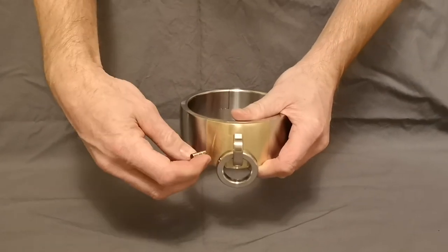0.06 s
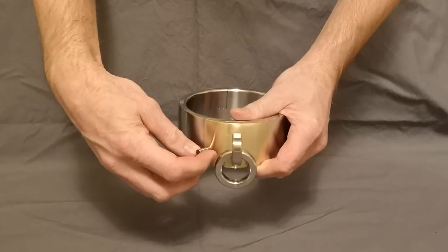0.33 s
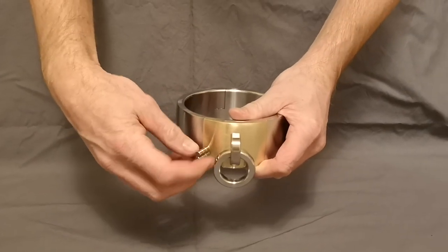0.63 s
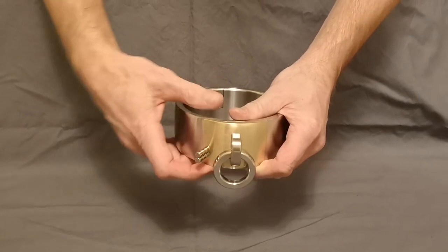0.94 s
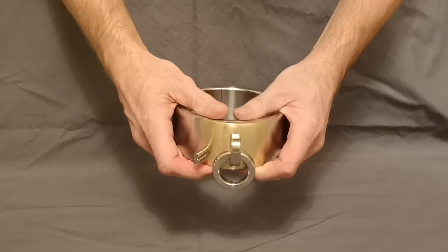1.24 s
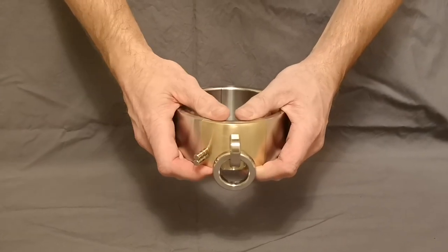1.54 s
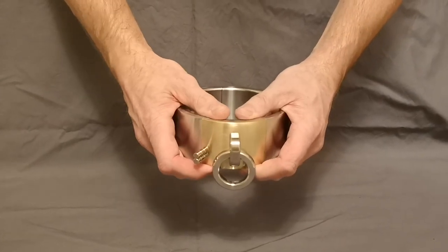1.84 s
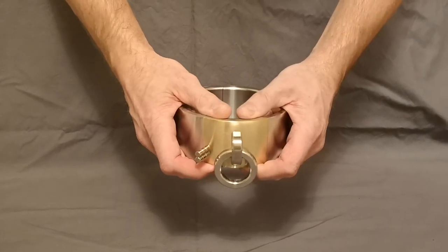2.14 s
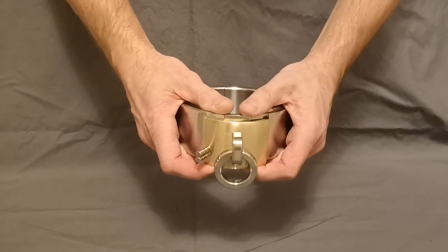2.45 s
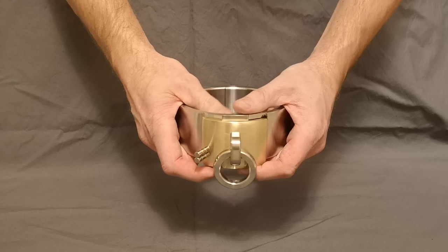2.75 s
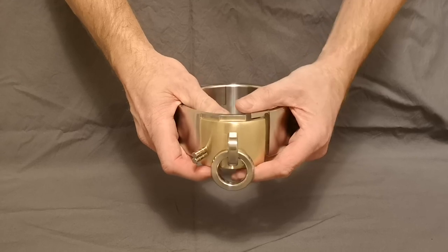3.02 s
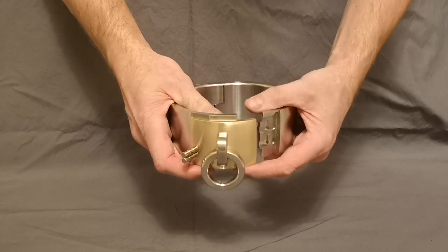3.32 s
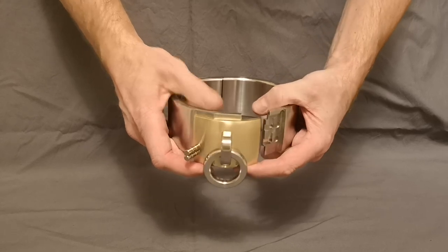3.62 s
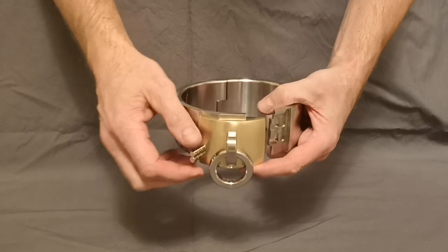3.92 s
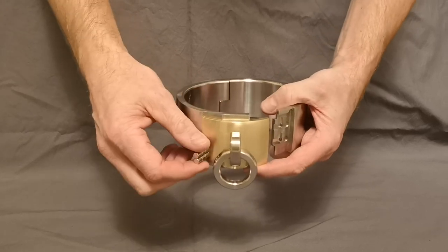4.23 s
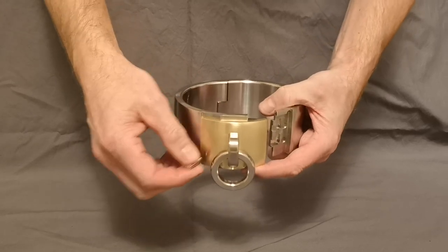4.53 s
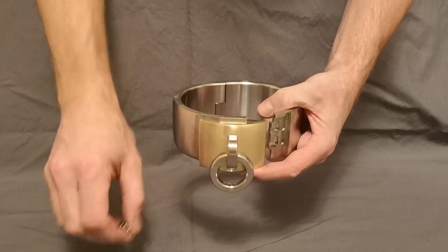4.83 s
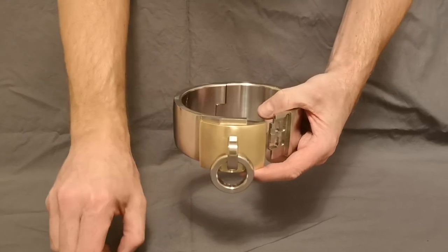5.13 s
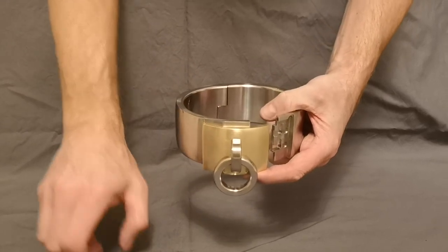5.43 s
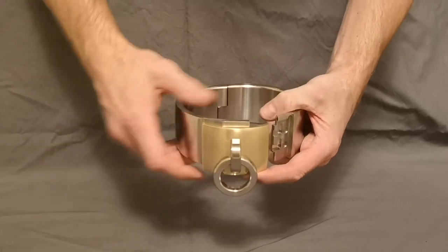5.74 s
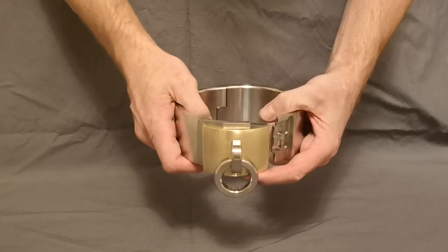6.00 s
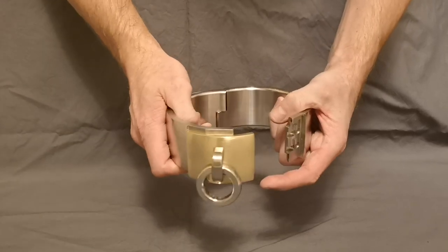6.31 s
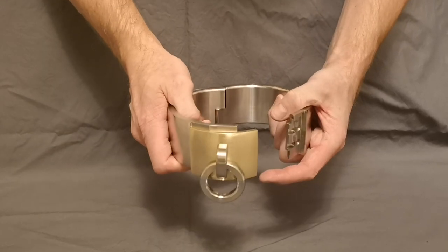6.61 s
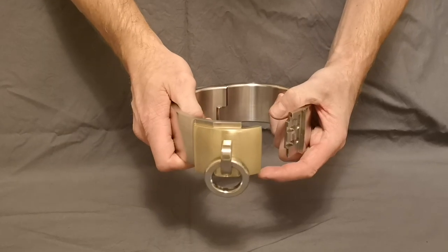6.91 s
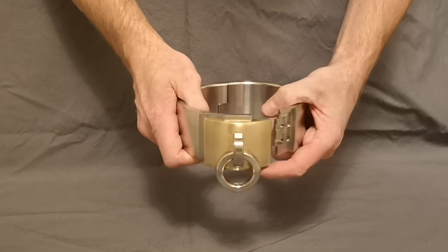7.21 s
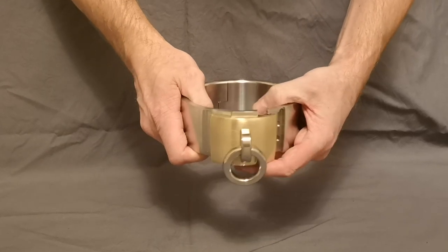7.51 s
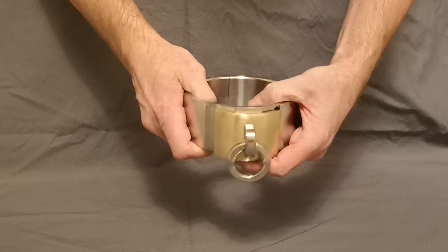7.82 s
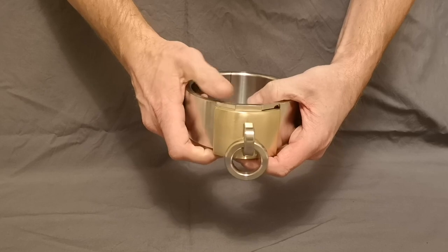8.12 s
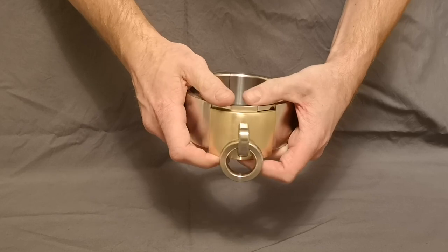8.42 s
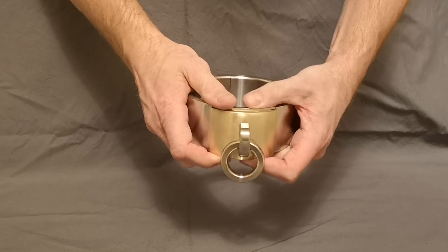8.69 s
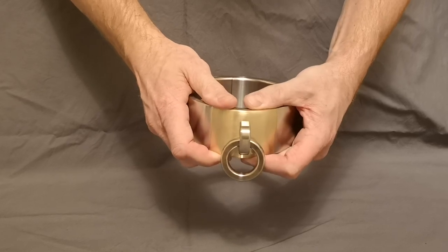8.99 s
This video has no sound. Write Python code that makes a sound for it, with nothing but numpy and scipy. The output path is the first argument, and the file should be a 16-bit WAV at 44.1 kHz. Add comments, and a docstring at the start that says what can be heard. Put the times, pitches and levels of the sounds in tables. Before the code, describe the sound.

A hinged steel collar is handled close to a stereo microphone in a small, quiet room with a faint low rumble. Each contact is a short, hand-damped metallic crack with a little room tail. A key ticks lightly into the lock at 0.4 seconds, and the lock snaps open, sharp and bright, at 1.9. From 2.3 to 3.5 the halves work apart with duller clicks and small ticks. The key comes out with a crisp click at 4.6. After a lull, the hinge ticks faintly from 6.2 to 6.8. A dull click at 7.4 leads to the loudest sounds, two steel clashes at 7.6 and 7.9, with a brief rattle after the second and a faint, thin, very high ring. Light touches follow, the lock clicks home at 8.6, and a last bright click comes at 9 seconds.

```python
"""A small, quiet room; a stereo microphone stands close to a hinged steel collar handled over a cloth.
A key turns and the lock snaps open, the halves scrape apart, swing on the hinge, clash shut twice,
and the lock clicks. Each contact is steel chattering on steel, coloured by the modes of the collar.
The hands damp the steel, so it is a short crack; most of its tail is the room."""
import sys
import numpy as np
from scipy import signal
from scipy.fft import rfft, irfft, next_fast_len
from scipy.io import wavfile
from scipy.ndimage import map_coordinates

SR = 44100
rng = np.random.default_rng(int(sys.argv[2]) if len(sys.argv) > 2 else 0)


def wrap_up_sound(samples):
    """Save the sound to the file named by the first command line argument, as 16-bit audio."""
    columns = np.atleast_2d(samples).T
    # keep every value between -1 and 1, then stretch to whole-number steps
    tamed = np.clip(columns, -1, 1)
    steps = np.round(tamed * 32767).astype(np.int16)
    wavfile.write(sys.argv[1], SR, steps)


N = 403515
SIZE = 32768  # samples in one contact with its tail
HZ = np.fft.rfftfreq(SIZE, 1 / SR)
T = np.arange(SIZE) / SR

# room tone: f/Hz, relative level/dB
ROOM_TONE = [(18, -3.5), (31, -9.5), (42, -4.5), (62, -19), (92, -12.5), (120, -29.5), (175, -30),
             (280, -34.5), (590, -43.5), (1900, -38), (2800, -41), (3500, -45), (7500, -47.5),
             (8600, -52.5), (16000, -55)]
# how alike the room tone is in the two channels: f/Hz, correlation
ROOM_TONE_LIKENESS = [(60, 1), (150, .87), (380, -0.57), (950, 0), (15000, -0.41)]
# decay of the room: f/Hz, t60/s
ROOM_DECAY = [(200, .3), (1200, 0.35), (3000, 0.37), (7000, 0.32), (14000, 0.32)]
# straight path to the microphone, shaped by the bounce off the table: f/Hz, level/dB
DIRECT_PATH = [(600, -3), (950, 3.5), (1350, -1), (1620, 3.5), (2000, -0.5), (3000, -3.5), (12000, -0.5)]
# balance of the collar at the microphone: f/Hz, left minus right/dB
BALANCE = [(500, 7), (1200, -0.5), (2200, -1.5), (4500, 1), (7000, 1.5), (12000, 0)]
# colour of all contacts; small steel parts radiate little bass: f/Hz, level/dB
STEEL_COLOUR = [(60, -36), (240, -17.5), (350, -14.5), (470, -18.5), (620, -18.5), (900, -9), (1200, -3.5),
                (1380, -9), (1600, -4.5), (2500, -0.5), (3050, -3.5), (7800, -0.5), (9500, -4),
                (11800, -2.5), (14000, -10), (15500, -29.5)]
# modes of the hand-held band: f/Hz, width/Hz, lift/dB
BAND_MODES = [(1235.3, 30, 2.5), (1550, 83, 3.5), (1860, 15, 1), (2030, 22, 3.5), (2301, 16, 1.5),
              (2505, 8.2, -1.5), (2637, 44, 3.5), (3205, 39, 6.5), (3473, 150, 4), (3950, 130, 4),
              (4904, 18, 8), (5170, 170, 8), (5700, 35, 1), (5880, 110, 1.5), (6940, 160, 3),
              (7830, 150, 4.5), (9060, 100, 9), (10290, 82, 12), (13470, 50, 7)]
# modes of the parts that get struck: f/Hz, width/Hz, relative lift/dB
KEYHOLE = [(1600, 140, 14.5), (3700, 600, 15)]
KEY = [(2260, 150, 8.3), (3000, 140, 2.8), (5050, 280, 1.8), (5800, 380, 3.3), (8990, 62, 5.7)]
BOLT = [(920, 120, 3.2), (2908, 400, 6), (4200, 300, 3), (7340, 410, 11.7)]
CATCH = [(2620, 170, 6), (7300, 110, 14)]
RIM = [(1720, 290, 6), (5600, 570, 4)]
STUDS = [(2400, 220, 1.6), (4000, 630, 11)]
TONGUE = [(940, 160, 7.2), (2064, 91, 17.9)]
HALVES = [(340, 140, 5), (1222, 89, 16.5), (1811, 25, -0.5), (2080, 40, 1), (3350, 17, 1.5), (4820, 25, 3),
          (6825, 25, 11.5)]
# how each part sounds out, by name: low knock/dB, left minus right/dB, room tail/dB, modes
PARTS = { "keyhole": (-14, -1.5, -9, KEYHOLE), "key": (-17, -2, -6, KEY), "bolt": (-9.5, -0.32, -7.5, BOLT),
         "catch": (-6.5, -3, -4.5, CATCH), "rim": (-5.5, -2.5, -8, RIM), "studs": (-8, -4, -7, STUDS),
         "tongue": (-7.5, -5, -7, TONGUE), "halves": (-14.5, -3, -4, HALVES), }
# sharp contacts: t/s, relative level/dB, brightness/dB, chatter t60/s, extra mode lift/dB, part struck
# key in at 0.36 s, lock open at 1.9, key out at 4.57, clashes at 7.64 and 7.87, lock home at 8.61
CLICKS = [ (0.3583, -17, -3, 0.02, -2, "keyhole"), (1.901, -0.5, 6, 0.018, 1.5, "bolt"),
          (2.489, -7.5, -14, 0.033, 4.5, "rim"), (2.829, -24.5, -6.5, 0.027, 5.5, "studs"),
          (2.8938, -7.5, -13.5, 0.042, -1, "studs"), (2.9069, -4.5, -18, 0.12, 4, "rim"),
          (3.0157, -20, -22, 0.032, 4.5, "rim"), (3.2653, -6, -5.5, 0.026, 1.5, "catch"),
          (4.5693, -6, 7.5, 0.023, 2, "key"), (7.4449, -4, -28.5, 0.027, 2, "catch"),
          (7.64, 18.5, -8, .034, -4, "halves"), (7.846, -9.5, -9, .045, -3.5, "rim"),
          (7.8563, -7, -9.5, 0.041, 3, "studs"), (7.8740, 19, -6.5, .033, 1, "halves"),
          (7.895, 5, -12.5, .03, -5, "halves"), (7.951, 2, -9.5, .03, -5, "halves"),
          (8.0249, -3, -10, 0.018, -4.5, "halves"), (8.6138, -6, -20.5, 0.033, -1.5, "tongue"),
          (8.8906, -23.5, 0, 0.023, 2.5, "key"), (9.0092, -6, 4, 0.032, -0.5, "key"), ]
# light touches of hinge and pins: t/s, relative level/dB, brightness/dB
TICKS = [(.463, -25.5, -10.5), (1.3372, -31, -0.5), (2.7482, -20, -11.5), (2.975, -19, -6.5),
         (3.138, -20, -6), (3.241, -16, -20.5), (3.445, -18, -26.5), (3.484, -19, -26), (6.175, -18, -28),
         (6.231, -20.5, -20), (6.249, -17.5, -24), (6.352, -23.5, -25), (6.384, -20, -14),
         (6.469, -19, -13), (6.6056, -22, -1.5), (8.301, -15, -18.5)]
# soft slides: middle t/s, length/s, f/Hz, width/Hz, level/dB
SLIDES = [(1.351, 0.023, 5150, 890, -63.5), (5.415, .05, 7800, 2500, -69), (7.593, 0.056, 7440, 296, -69.5)]
# a small pin rings on after some contacts: t/s, relative level/dB
PIN_RINGS = [(1.902, -62), (2.748, -77), (6.231, -78), (6.385, -81), (6.607, -62.5), (7.641, -59.5),
             (7.875, -57.5), (7.953, -55), (8.615, -75)]
# the fingers shift the halves against each other: start t/s, end t/s, relative level/dB
FIDGETS = [(2.278, 2.47, -26.5), (6.667, 6.76, -27.5), (8.095, 8.2, -26.5), (8.42, 8.59, -26)]


def amp(db):
    """Decibels to gain."""
    return 10 ** (np.asarray(db) / 20)


def unit(x):
    """Scale to rms 1."""
    return x / np.sqrt(np.mean(x ** 2) + 1e-20)


def along(points, hz):
    """Read (f/Hz, value) points on a log frequency axis."""
    freqs, values = np.transpose(points)
    return np.interp(np.log(hz + 1), np.log(freqs + 1), values)


def filtered(x, response):
    """Pass a full-length signal through a gain given as a function of frequency."""
    size = next_fast_len(N + SR // 2)
    return irfft(rfft(x, size) * response(np.fft.rfftfreq(size, 1 / SR)), size)[..., :N]


def wobble(rate):
    """A smooth random curve, rate knots a second."""
    knots = rng.standard_normal(int(N * rate / SR) + 4)
    return map_coordinates(knots, [np.arange(N) * rate / SR])


def add(track, s, sound):
    """Mix a stereo sound into the track at s seconds."""
    start = round(s * SR)
    track[:, start:start + sound.shape[1]] += sound[:, :N - start]


def resonance(hz, width, lift_db):
    """The dB bump of one mode."""
    return 10 * np.log10(1 + amp(lift_db) ** 2 / (1 + (2 * (HZ - hz) / width) ** 2))


def causal(db):
    """The minimum-phase response of a dB curve: peaks ring after the blow."""
    cepstrum = irfft(db * np.log(10) / 20)
    cepstrum[1:SIZE // 2] *= 2
    cepstrum[SIZE // 2 + 1:] = 0
    return np.exp(rfft(cepstrum))


def room_tone(noise_db=-58, hum_hz=89, hum_db=-77, swell_db=2):
    """Room rumble, alike in both channels, with a wavering low hum and a faint hiss."""
    def mid_side_gains(hz):
        spread = np.arccos(np.clip(along(ROOM_TONE_LIKENESS, hz), -1, 1)) / 2
        return amp(along(ROOM_TONE, hz)) * [np.cos(spread), np.sin(spread)]

    mid, side = filtered(rng.standard_normal((2, N)), mid_side_gains)
    phase = 2 * np.pi * hum_hz * np.arange(N) / SR + 1.3 * wobble(rate=6.4)
    hum = amp(hum_db + swell_db * wobble(rate=2.3)) * np.sin(phase)
    return amp(noise_db) * unit(np.array([mid + side, mid - side])) + hum


def chatter(t60, stereo_spread=1.4, rise_s=0.00023, hold=1.57):
    """Steel rattling briefly on steel: an even-spectrum burst of energy 1, partly unlike in each channel."""
    fade = amp(-60 * (T / t60) ** hold) * (1 - np.exp(-T / rise_s))
    burst = (rng.standard_normal(SIZE) + stereo_spread * rng.standard_normal((2, SIZE))) * fade
    for _ in range(2):  # flatten the spectrum while keeping the burst short
        burst = irfft(np.exp(1j * np.angle(rfft(burst)))) * np.sqrt(fade)
    return burst / np.linalg.norm(burst, axis=1, keepdims=True)


def dense_modes(spacing_hz=170, depth_db=2.2):
    """Each point of contact drives the many close modes differently: a random ripple in dB."""
    knots = rng.standard_normal(int(SR / 2 / spacing_hz) + 4)
    return depth_db * map_coordinates(knots, [HZ / spacing_hz])


def room(wet_db, build_s=0.003):
    """Response at the microphone: the direct path plus a short diffuse tail, longest near 3 kHz."""
    hz, t, noise = signal.stft(rng.standard_normal((2, SIZE)), SR, nperseg=256)
    decay = amp(-60 * t / along(ROOM_DECAY, hz)[:, None])
    tail = signal.istft(noise * decay, SR, nperseg=256)[1][:, :SIZE]
    tail *= 1 - np.exp(-(T / build_s) ** 2)
    tail /= np.linalg.norm(tail, axis=1, keepdims=True)
    return causal(along(DIRECT_PATH, HZ)) + amp(wet_db) * rfft(tail)


def contact(colour_db, t60, pan_db, wet_db, lag_s=.00022):
    """Chatter rings the steel band and the room, reaching the left of the microphone first."""
    collar_db = along(STEEL_COLOUR, HZ) + sum(resonance(*mode) for mode in BAND_MODES)
    crack = rfft(chatter(t60)) * causal(colour_db + collar_db + dense_modes())
    sides = np.array([[.5], [-.5]])
    balance = amp(sides * (pan_db + along(BALANCE, HZ)))
    delay = np.exp(2j * np.pi * HZ * lag_s * (sides - .5))
    return irfft(crack * balance * delay * room(wet_db))


def hardness(bright_db, knock_db):
    """The dB colour of a blow: the harder the contact, the more the treble is tilted up."""
    return along([(1100, knock_db), (1600, 0), (2600, 0.011), (4000, -2.1 + .75 * bright_db),
                  (7200, bright_db), (10500, -15.5 + 1.5 * bright_db)], HZ)


def clicks():
    """Key, bolt and halves: each blow has its own brightness and rings the part it strikes."""
    track = np.zeros((2, N))
    for s, db, bright_db, t60, ring_db, part in CLICKS:
        knock_db, pan_db, wet_db, modes = PARTS[part]
        modes_db = sum(resonance(hz, width, lift_db + ring_db) for hz, width, lift_db in modes)
        add(track, s, contact(db + hardness(bright_db, knock_db) + modes_db, t60, pan_db, wet_db))
    return track


def ticks(touches, trim_db=-2):
    """Light touches of steel, with little in the top octave."""
    track = np.zeros((2, N))
    for s, db, bright_db in touches:
        colour_db = along([(1100, -6.0), (1600, 1.5), (2400, 0), (4500, bright_db + 1.5),
                           (7500, bright_db - 0.5), (11000, bright_db - 27.5)], HZ)
        t60 = 0.022 * np.exp(-0.021 * bright_db)  # the duller ones rub for longer
        add(track, s, contact(db + trim_db + colour_db, t60, pan_db=-2, wet_db=-6))
    return track


def slides():
    """Skin, cloth and steel slide on each other: brief swells of friction hiss."""
    t = np.arange(N) / SR
    track = np.zeros((2, N))
    for s, length, hz, width, db in SLIDES:
        hiss = filtered(rng.standard_normal((2, N)), lambda f: 1 / (1 + (2 * (f - hz) / width) ** 2))
        swell = np.exp(-(2 * (t - s) / length) ** 2 / 2)
        track += amp(db) * swell * unit(hiss)
    return track


def pin(hz=12295, t60=.32, attack_s=.002, waver_rad=.6):
    """A small pin that the hands do not damp: a thin, very high, slightly unsteady ring."""
    track = np.zeros((2, N))
    fade = amp(-60 * T / t60) * (1 - np.exp(-T / attack_s))
    for s, db in PIN_RINGS:
        drift = np.interp(T, np.linspace(0, T[-1], num=100), rng.standard_normal(100))
        ring = fade * np.sin(2 * np.pi * hz * T + waver_rad * drift)
        add(track, s, amp(db) * irfft(rfft(ring) * room(wet_db=-14.0)))
    return track


def fidgets(gap_s=.06, bright_db=-18.5, scatter_db=2):
    """Faint, unevenly spaced touches as the fingers shift the halves, as rows like those of TICKS."""
    touches = []
    for start, end, db in FIDGETS:
        count = max(1, round((end - start) / gap_s))
        for k, (late, force, bright) in enumerate(2 * rng.random((count, 3)) - 1):
            s = start + (end - start) * (k + .5 + late * 0.18) / count
            touches.append((s, db + scatter_db * force, bright_db + 2 * scatter_db * bright))
    return touches


def scene():
    """The collar close to the microphone, the quiet room behind it."""
    return clicks() + ticks(TICKS + fidgets()) + pin() + slides() + room_tone()


def record(dry, top_hz=15750):
    """The recorder keeps nothing above its band limit."""
    return filtered(dry, lambda hz: hz < top_hz)


dry = scene()
out = record(dry)
wrap_up_sound(out)
```